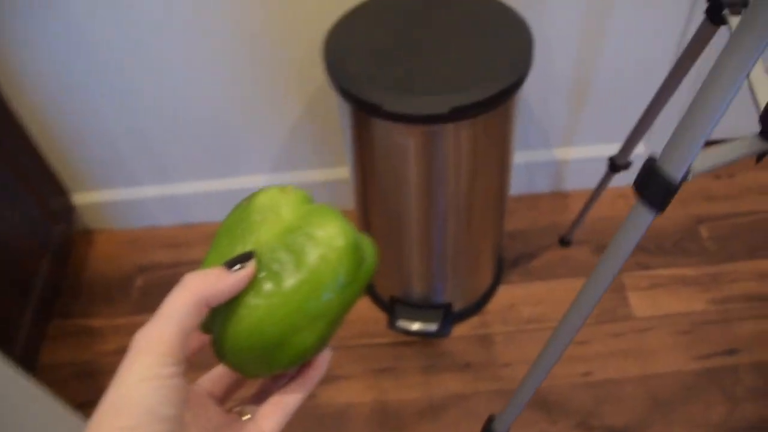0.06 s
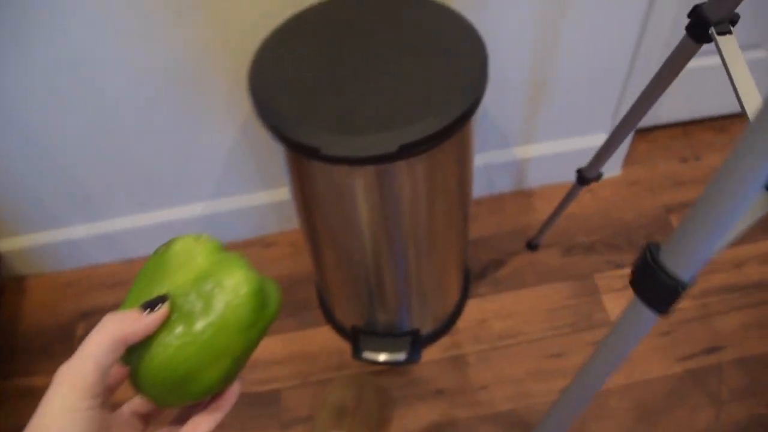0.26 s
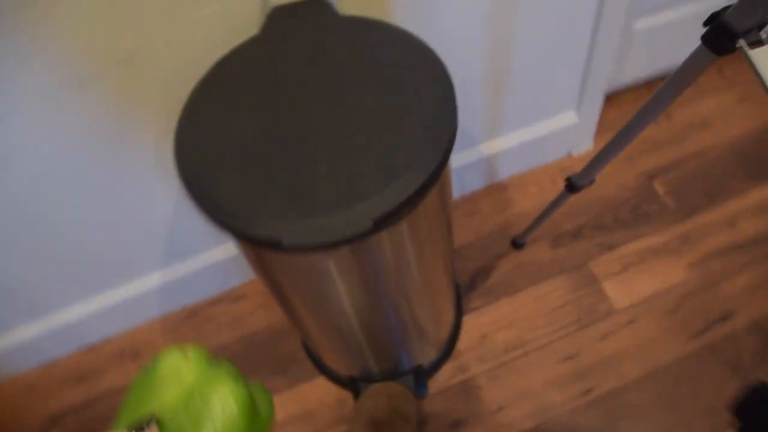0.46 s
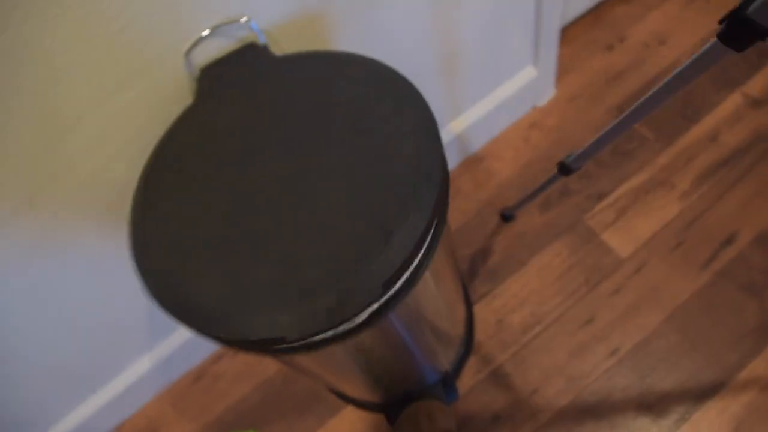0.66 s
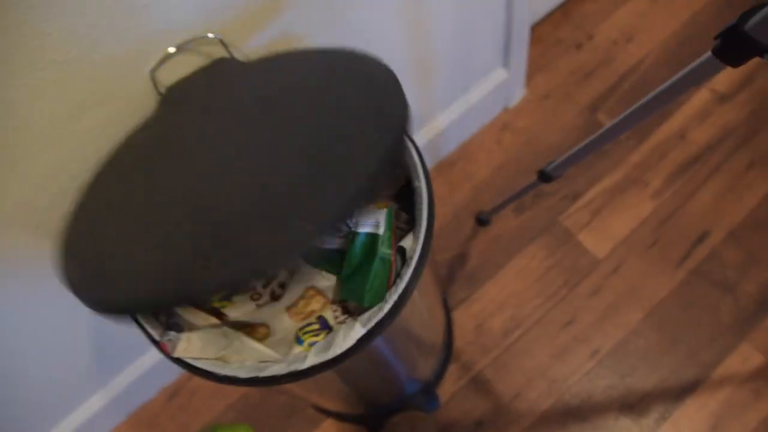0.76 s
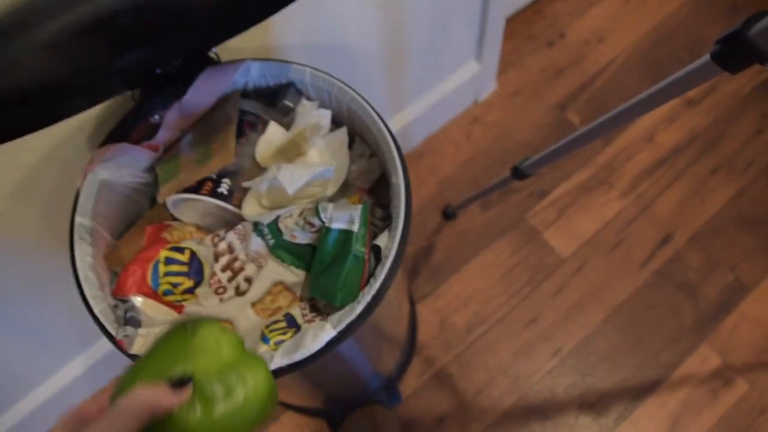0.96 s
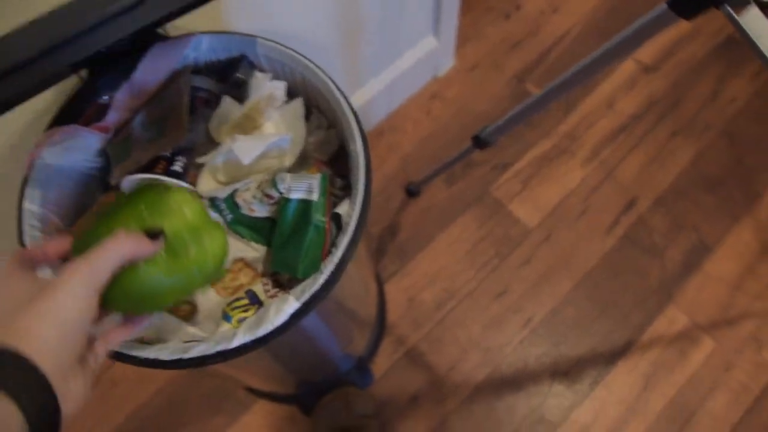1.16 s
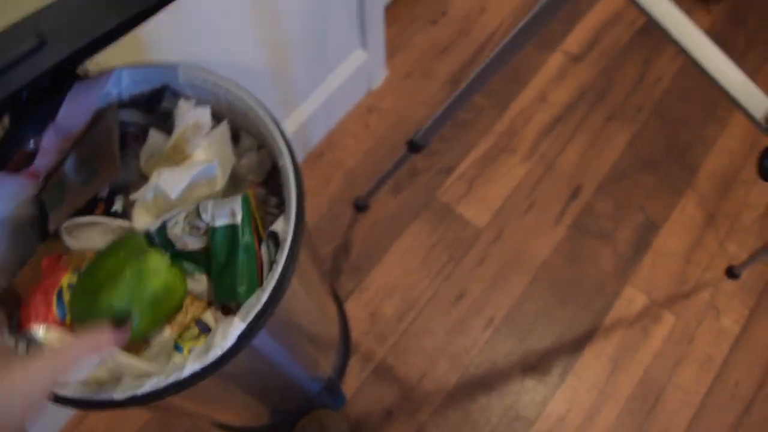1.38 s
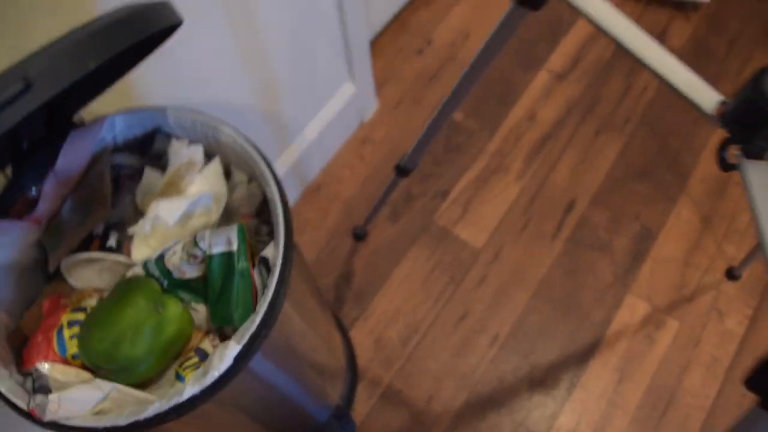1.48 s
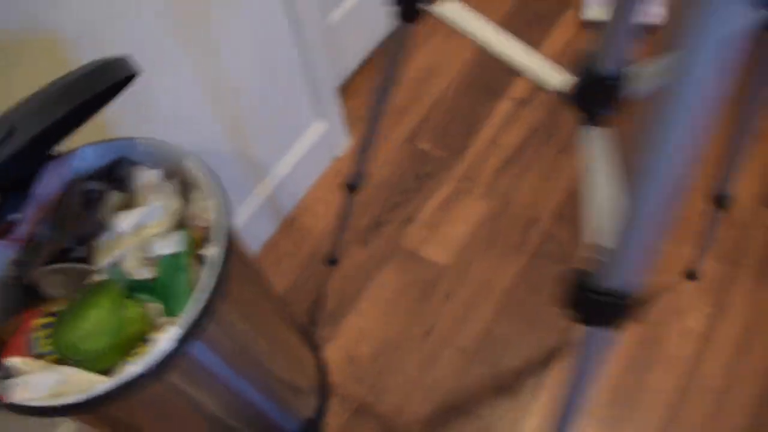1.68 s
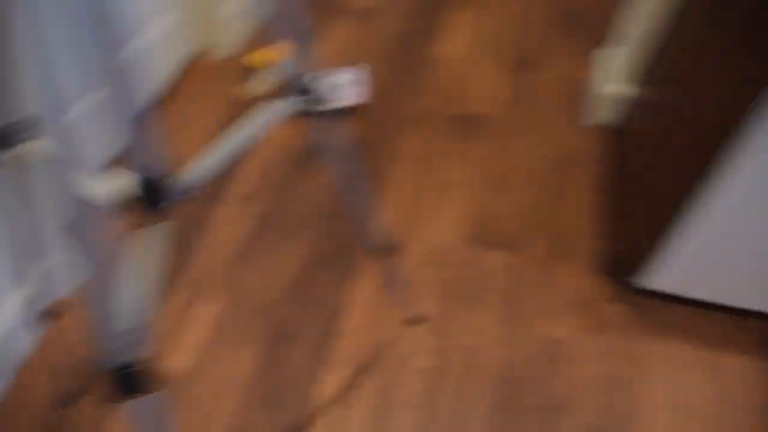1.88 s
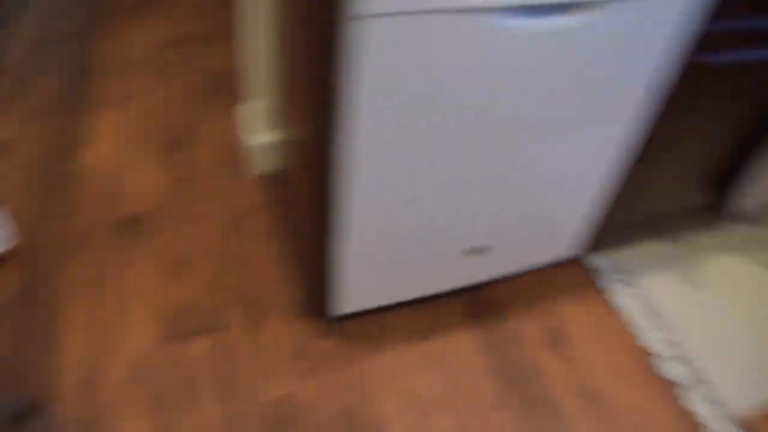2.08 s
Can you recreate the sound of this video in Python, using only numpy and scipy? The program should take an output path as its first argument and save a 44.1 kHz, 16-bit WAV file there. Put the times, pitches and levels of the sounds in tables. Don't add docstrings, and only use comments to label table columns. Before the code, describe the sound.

A step-on bin's pedal snaps, its lid clatters open, something drops on crackling wrappers, lid shuts

```python
import sys
import numpy as np
from scipy import signal
from scipy.fft import rfft, irfft
from scipy.io import wavfile
from scipy.ndimage import uniform_filter1d

SR = 44100
rng = np.random.default_rng(int(sys.argv[2]) if len(sys.argv) > 2 else 0)


def unload_wav(signal):
    wavfile.write(
        sys.argv[1],
        SR,
        np.round(np.clip(np.atleast_2d(signal).T, -1, 1) * 32767).astype(np.int16),
    )


def decibels_to_gain(level_db):
    exponent = np.asarray(level_db, float) / 20
    return 10 ** exponent


N = 93977
PORTS = np.array([[1], [-1]])


def read(table, hz, col):
    table = np.array(table, float)
    return np.interp(np.log(np.maximum(hz, 1)), np.log(table[:, 0]), table[:, col])


def unit(x):
    return x / np.sqrt(np.mean(x ** 2))


def colour(x, table):
    cepstrum = irfft(np.log(decibels_to_gain(read(table, np.linspace(0, SR / 2, 2049), 1))))
    cepstrum[1:2048] *= 2
    cepstrum[2049:] = 0
    response = irfft(np.exp(rfft(cepstrum)))
    return signal.fftconvolve(x, response)[:len(x)]


def highpass(x, hz):
    return signal.sosfilt(signal.butter(2, hz, "high", fs=SR, output="sos"), x)


def curve(table):
    table = np.array(table, float)
    return decibels_to_gain(np.interp(np.arange(N) / SR, table[:, 0], table[:, 1], left=-120, right=-120))


def noise(table):
    return unit(colour(rng.standard_normal(N), table))


def add(out, s, x):
    i = int(s * SR)
    out[i:i + len(x)] += x[:N - i]


# (frequency [Hz], level [dB])
CRACK = [(290, -20), (500, 6), (2680, -6), (3230, -7.5), (4470, -13.5), (15000, -48.5)]


def knocks(hits, body, crack_db, crack_ms, room_db, room_crack_db):
    longest_ring_ms, feed_ms = 90, 5
    out, feed, t = np.zeros(N), np.zeros(N), np.arange(6000) / SR
    t_ms = t * 1000
    hz, t60_ms, db = np.array(body, float).T[:, :, None]
    t60_ms = np.minimum(t60_ms, longest_ring_ms)
    chances = rng.standard_normal((len(hits), 2, len(body), 1))
    hisses = rng.standard_normal((len(hits), len(t)))
    tick = unit(colour(1. * (t == 0), CRACK)) / 10
    for (s, peak_db, contact_ms), (level_chance, pitch_chance), hiss in zip(hits, chances, hisses):
        decay = decibels_to_gain(db + 3.5 * level_chance - 60 * t_ms / t60_ms)
        ring = decay * np.sin(2 * np.pi * hz * (1 + .02 * pitch_chance) * t)
        u = t_ms[:800] / max(contact_ms, .03)
        blow = signal.fftconvolve(ring.sum(axis=0), u * np.exp(-u))[:len(t)]
        blow = blow / np.abs(blow).max()
        crack = colour(hiss * np.minimum(t_ms, 1) * np.exp(-t_ms / crack_ms), CRACK)
        crack = crack / np.abs(crack).max()
        hard = min(.1 / contact_ms, 2)
        add(out, s, decibels_to_gain(peak_db) * (blow + hard * decibels_to_gain(crack_db) * crack))
        thud = unit(blow * np.exp(-t_ms / feed_ms)) * blow.std()
        add(feed, s, decibels_to_gain(peak_db) * (decibels_to_gain(room_db) * thud + hard * decibels_to_gain(room_crack_db) * tick))
    return np.array([out, feed])


def bursts(events, spectrum, room_db):
    out, feed, t = np.zeros(N), np.zeros(N), np.arange(4000) / SR
    draws = rng.standard_normal((len(events), 2, len(t)))
    tick = unit(colour(1. * (t == 0), spectrum))
    for (s, peak_db, burst_ms), (clicks, chance) in zip(events, draws):
        u = t * 1000 / max(burst_ms, .1)
        shape = np.exp(0.44 * chance) * np.minimum(u * 3, 1) * np.exp(-u)
        tint = [(hz, db + 2.85 * chance[k]) for k, (hz, db) in enumerate(spectrum)]
        x = colour(clicks * shape, tint)
        x = decibels_to_gain(peak_db) * x / np.abs(x).max()
        add(out, s, x)
        add(feed, s, decibels_to_gain(room_db) * tick * np.sqrt(np.mean(x ** 2)))
    return np.array([out, feed])


# (frequency [Hz], level [dB])
HUM = [(30, -11.5), (360, 1.5), (650, 0), (890, 1.5), (1700, -8.5), (9000, -33), (13500, -49)]


def appliance_hum():
    return decibels_to_gain(-51.5) * noise(HUM)


# (frequency [Hz], level [dB])
HISS = [(3000, -6), (7000, 0), (11000, -8), (13500, -26)]


def port_hiss():
    return decibels_to_gain(-74) * np.array([noise(HISS), noise(HISS)])


# (frequency [Hz], level [dB])
RUMBLE = [(20, -26.5), (60, -1), (150, -4.5), (400, -9), (900, -46)]
# (time [s], level [dB])
HANDLING = [(0, -69.5), (1.55, -69), (1.7, -50), (1.9, -36.5), (2.14, -58)]


def handling_rumble():
    rumble = np.array([noise(RUMBLE), noise(RUMBLE)])
    slow = uniform_filter1d(uniform_filter1d(rng.standard_normal(N), size=900), size=900)
    return rumble * curve(HANDLING) * decibels_to_gain(2.2 * unit(slow))


# (time [s], peak level [dB], contact [ms])
STEP_HITS = [
    (.003, -27.5, 0.16),
    (.05, -44, 0.75),
    (.235, -38.5, 0.24),
    (.352, -38, 0.75),
    (.416, -48, 0.043),
]
# (frequency [Hz], T60 [ms], level [dB])
LID = [(113.4, 190, -2), (184, 50, -21), (270, 50, -31), (378, 107, 10.5), (449, 110, 8.5), (514, 97, -3),
       (754, 69, 8.5), (854, 106, 10), (1024, 100, 2), (1194, 19, 15.5), (1370, 55, 6.5), (1520, 24, -20),
       (2930, 25, -4.5)]


def steps():
    return knocks(STEP_HITS, LID, crack_db=4, crack_ms=3.2, room_db=-4.5, room_crack_db=5)


# (frequency [Hz], T60 [s])
KITCHEN = [(90, 0.54), (250, 0.43), (700, 0.68), (2000, 0.53), (4500, 0.58), (9000, 0.56), (14000, 0.75)]
# (frequency [Hz], side minus mid [dB])
ECHO_SIDE = [(250, -34), (1000, -30), (3000, -20), (6000, -11), (11000, -4)]


def kitchen(feed):
    first_echo_s, build_s = 0.0041, 0.0027
    t = np.arange(SR) / SR
    mid, side = np.zeros(SR), np.zeros(SR)
    hz = np.linspace(0, SR / 2, SR // 2 + 1)
    for centre_hz in 45 * 2 ** np.arange(0, 9., .5):
        octaves = np.log2(np.maximum(hz, 1) / centre_hz)
        band = np.cos(np.pi / 2 * np.clip(2 * octaves, -1, 1))
        fall = np.exp(-np.log(1000) * t / read(KITCHEN, centre_hz, 1))
        mid += fall * irfft(band * rfft(rng.standard_normal(SR)))
        width = decibels_to_gain(read(ECHO_SIDE, centre_hz, 1))
        side += fall * irfft(band * rfft(rng.standard_normal(SR))) * width
    rise = np.clip((t - first_echo_s) / build_s, 0, 1)
    scale = 1 / np.sqrt(np.sum((mid * rise) ** 2))
    mid = signal.fftconvolve(feed, mid * rise * scale)[:N]
    side = signal.fftconvolve(feed, side * rise * scale)[:N]
    return mid + PORTS * side


# (time [s], peak level [dB], burst [ms])
SCUFFS = [
    (.266, -38, 17.4),
    (.290, -32, 6.9),
    (.321, -47, 25.),
]
# (frequency [Hz], level [dB])
SCUFF = [(290, -31), (500, -8.5), (1260, -11), (2570, -5.5), (15000, -30.5)]


def scuffs():
    return bursts(SCUFFS, SCUFF, room_db=1)


# (time [s], peak level [dB], contact [ms])
PEDAL_HITS = [
    (.4735, -12, 0.28),
    (.4760, -13.5, 0.012),
    (.481, -27.5, 0.18),
    (1.675, -30.5, 0.043),
    (1.693, -24.5, 0.23),
    (1.720, -23, 0.12),
    (1.727, -26.5, 0.52),
    (1.745, -25.5, 0.22),
]
# (frequency [Hz], T60 [ms], level [dB])
PEDAL = [(266, 14, 14), (430, 38, 7.5), (580, 32, 5.5), (734, 25, 5), (990, 33, 8), (1500, 5, -20),
         (2050, 34, -16), (2400, 35, -6), (2804, 61, 17), (4100, 34, 1)]


def pedal():
    return knocks(PEDAL_HITS, PEDAL, crack_db=2.5, crack_ms=6.2, room_db=2.5, room_crack_db=1.5)


# (time [s], peak level [dB], contact [ms])
LID_HITS = [(.684, -11, 0.13), (.710, -26.5, 0.12), (.726, -34, 0.22), (.743, -16, 0.14),
            (.7625, -0.5, 0.24), (.774, -2, 0.14), (.789, -18.5, 0.029), (.801, -19, .04),
            (.815, -20.5, 0.24), (.826, -21, .04), (.851, -17, 0.044), (.8645, -2.5, 0.1),
            (.869, -8.5, 0.18), (.879, -21, 0.29), (.898, -0.5, 0.018), (.902, -21.5, 0.024)]


def lid_opening():
    return knocks(LID_HITS, LID, crack_db=-19, crack_ms=9.0, room_db=-2.0, room_crack_db=-17.5)


# (time [s], peak level [dB], contact [ms])
HINGE_TICKS = [
    (.774, -38, 0.044),
    (.789, -25.5, 0.15),
    (.838, -25, 0.041),
    (.864, -15.5, 0.03),
    (.881, -45, 0.043),
]
# (frequency [Hz], T60 [ms], level [dB])
HINGE = [(1953, 76, -6), (2230, 35, -23)]


def hinge():
    return knocks(HINGE_TICKS, HINGE, crack_db=-8, crack_ms=1.8, room_db=-8, room_crack_db=-9)


# (frequency [Hz], level [dB])
WRAPPER = [(180, -22.5), (300, 0.5), (1970, 3), (2880, -1.5), (3520, 2), (9390, -15.5), (16000, -26.5)]
# (time [s], level [dB])
RUSTLE = [(1.33, -88), (1.36, -37), (1.45, -42), (1.56, -59), (1.65, -63), (1.8, -58.5), (1.9, -79)]


def rustle():
    clicks_per_s, spread_db = 1900, 3
    hit = rng.random(N) < clicks_per_s / SR
    clicks = hit * rng.standard_normal(N) * decibels_to_gain(spread_db * rng.exponential(size=N))
    x = unit(colour(clicks, WRAPPER)) * curve(RUSTLE)
    return np.array([x, x])


# (time [s], peak level [dB], burst [ms])
WRAPPER_SNAPS = [(1.332, -28, 5.5), (1.338, -53, 2.1), (1.354, -10, 3.2), (1.366, -9.5, 6.7),
                 (1.377, -15, 1.2), (1.387, -48, 1.3), (1.435, -22, 2.1), (1.441, -13.5, 1.18),
                 (1.453, -30.5, 1.8), (1.472, -16.5, 1), (1.4975, -16, 3.1), (1.5145, -22, .9),
                 (1.521, -10, 2.7), (1.531, -15.5, 0.7), (1.544, -11, 1.1), (1.548, -10.5, 1.1),
                 (1.554, -17, 0.87), (1.563, -15, 0.52), (1.571, -32, 0.98)]


def wrapper_snaps():
    return bursts(WRAPPER_SNAPS, WRAPPER, room_db=-6)


# (time [s], peak level [dB], contact [ms])
DROP_HITS = [
    (1.349, -13, 0.39),
    (1.359, -12.5, 0.2),
    (1.368, -19, 0.1),
    (1.372, -16.5, 0.13),
]
# (frequency [Hz], T60 [ms], level [dB])
DROP = [(110, 46, -32), (253, 80, -11), (338, 42, 12.5), (590, 32, -22), (783, 93, 6.5), (846, 120, 13),
        (1347, 81, 15)]


def pepper_drop():
    return knocks(DROP_HITS, DROP, crack_db=3, crack_ms=2.4, room_db=-2, room_crack_db=-2)


# (time [s], peak level [dB], contact [ms])
GRIP_BUMPS = [
    (1.66, -43, 2.6),
    (1.72, -30, 2),
    (1.768, -26, 1.2),
    (1.797, -29.5, 1.5),
    (1.847, -29, 0.26),
    (1.857, -20.5, 0.2),
    (1.884, -19, 0.78),
    (2.043, -25, 0.85),
]
# (frequency [Hz], T60 [ms], level [dB])
GRIP = [(75, 42, -19), (131, 150, 0), (193, 113, 3), (328, 30, 7)]


def grip_bumps():
    direct, _ = knocks(GRIP_BUMPS, GRIP, crack_db=-29, crack_ms=2.5, room_db=-40, room_crack_db=-40)
    return highpass(direct * (1 + .75 * PORTS), 55)


# (time [s], peak level [dB], burst [ms])
ROD_SLIDES = [
    (1.81, -32, 31),
    (1.889, -23.5, 7.1),
]
# (frequency [Hz], level [dB])
ROD = [(900, 4), (2300, 0), (9000, -38)]


def rod_slides():
    return bursts(ROD_SLIDES, ROD, room_db=5)


# (time [s], peak level [dB], burst [ms])
RIM_SLAPS = [
    (1.9092, -11, 2.1),
]
# (frequency [Hz], level [dB])
RIM = [(410, -27.5), (700, -6), (1360, -5.5), (1490, -4.5), (4380, -10.5), (15000, -46)]


def rim_slap():
    return bursts(RIM_SLAPS, RIM, room_db=2)


# (time [s], peak level [dB], contact [ms])
SHUT_HITS = [
    (1.9095, -8, 0.26),
    (1.914, -20.5, 0.48),
]
# (frequency [Hz], T60 [ms], level [dB])
SHUT = [(101, 290, 14.5), (281, 37.5, 24), (440, 110, 7), (532, 47, 9.5), (850, 19, -6)]


def lid_shutting():
    return knocks(SHUT_HITS, SHUT, crack_db=-40, crack_ms=3.0, room_db=2, room_crack_db=-44)


def scene():
    blows = pedal() + lid_opening() + pepper_drop() + lid_shutting() + hinge() + rim_slap() + steps()
    friction = wrapper_snaps() + scuffs() + rod_slides() + rustle()
    direct, feed = blows + friction
    steady = appliance_hum() + port_hiss() + handling_rumble()
    port_lag = .35 * np.gradient(direct)
    room = highpass(direct + PORTS * port_lag + kitchen(feed), 222)
    return room + steady + grip_bumps()


def band_limit(x):
    return signal.sosfilt(signal.butter(12, 16820, fs=SR, output="sos"), x)


def record(dry):
    top_cut = signal.butter(10, 15800, fs=SR, output="sos")
    mix = signal.sosfilt(top_cut, dry)
    return band_limit(mix)


dry = scene()
out = record(dry)
unload_wav(out)
```